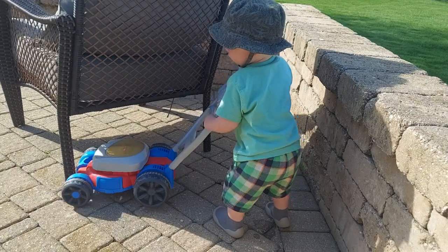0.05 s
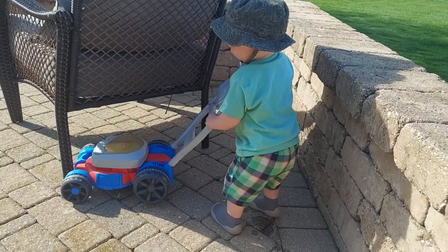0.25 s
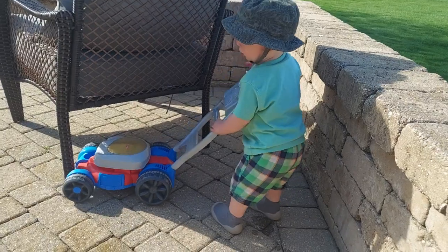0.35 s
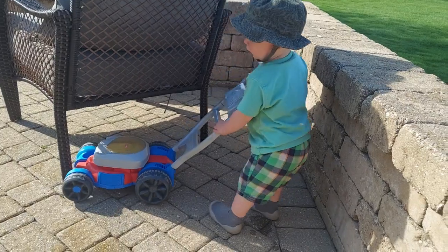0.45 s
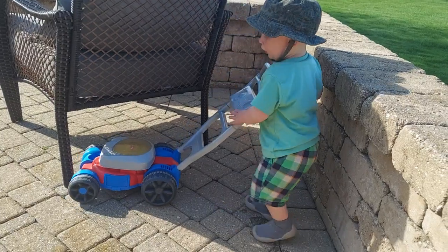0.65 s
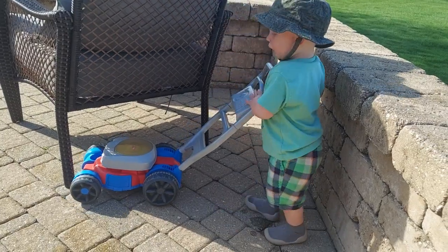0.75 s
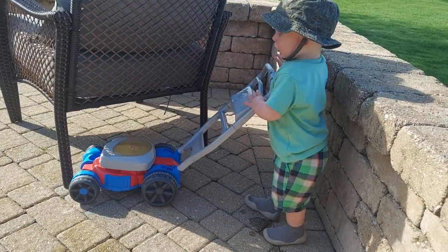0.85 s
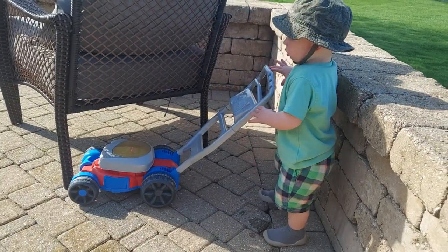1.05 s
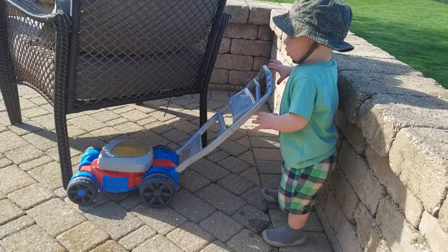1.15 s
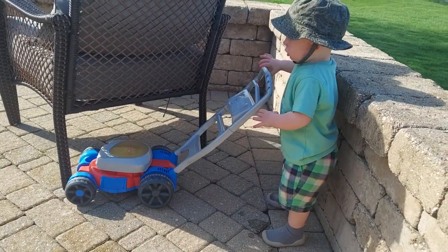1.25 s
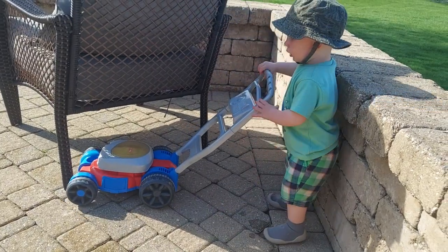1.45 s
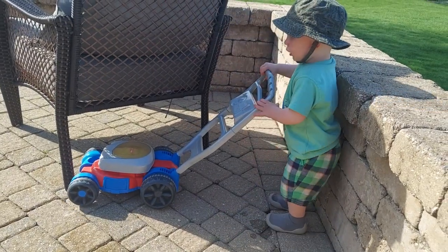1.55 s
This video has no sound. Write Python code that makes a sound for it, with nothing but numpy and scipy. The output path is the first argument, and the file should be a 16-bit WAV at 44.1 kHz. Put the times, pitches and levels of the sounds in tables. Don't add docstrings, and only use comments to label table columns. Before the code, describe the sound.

Plastic toy push mower clatters in two uneven bursts on stone paving, with shoe grit and birdsong

```python
import sys
import numpy as np
from scipy import signal
from scipy.fft import rfft, irfft
from scipy.io import wavfile
from scipy.ndimage import uniform_filter1d

SR = 44100
rng = np.random.default_rng(int(sys.argv[2]) if len(sys.argv) > 2 else 0)


def gain_from_decibels(decibels):
    exponent = np.asarray(decibels, float) / 20
    return 10 ** exponent


def waveform_to_disk(signal):
    frames = np.transpose(np.atleast_2d(signal))
    scaled = np.clip(frames, -1, 1) * 32767
    samples = np.round(scaled).astype(np.int16)
    wavfile.write(sys.argv[1], SR, samples)


N = 70560

OPEN_S = 0.1353

# frequency in Hz, level in dB, t60 in seconds.
SHELL_MODES = [(345.6, 0.5, 0.087), (474, 7, 0.042), (619, -8.5, 0.065), (730.6, 0, 0.03),
               (846, -3.5, 0.043), (944, -5.5, 0.038), (1075.5, -5.5, 0.046), (1344, -15, 0.035),
               (1515, -3.5, 0.079), (1832, -9.5, 0.032), (2050, -2, 0.02), (2240, -4.5, 0.029),
               (2548, 1, 0.018), (3446, 4.5, 0.0062), (4780, -2.5, 0.013)]


def evened(x):
    return x / np.sqrt(np.mean(x ** 2) + 1e-20)


def read(points, hz):
    f, value = np.transpose(points)
    return np.interp(np.log(hz + 1), np.log(f + 1), value)


def coloured(x, points):
    return irfft(rfft(x) * gain_from_decibels(read(points, np.fft.rfftfreq(N, 1 / SR))), N)


def add(mix, s, sound):
    part = mix[round(s * SR):][:len(sound)]
    part += sound[:len(part)]


def stroke(start, hold, t60, rise=.002):
    t = np.arange(N) / SR - start
    return np.clip(t / rise, 0, 1) * gain_from_decibels(-60 * np.maximum(t - hold, 0) / t60)


def clicks(per_s, spread_db):
    draw = rng.random((N, 3))
    happens = draw[:, 0] < per_s / SR
    size = gain_from_decibels(spread_db * np.minimum(-np.log(draw[:, 1] + 1e-9), 5))
    return happens * size * np.sign(draw[:, 2] - .5)


def garden():
    # frequency in Hz, level in dB per Hz.
    hiss = [(120, -29), (200, -1.5), (519, -3.5), (836, -21.5), (1300, -15.5), (1530, -14), (2330, -26),
            (5040, -11), (8200, -20), (8800, -24), (16000, -23)]
    z = rng.standard_normal((3, N))
    air = z[:2] + 0.6 * z[2]
    return gain_from_decibels(-65) * evened(coloured(air, [(60, -15)] + list(hiss)))


def wind():
    # start in seconds, hold in seconds, level in dB, left over right in dB.
    gusts = [(0.146, 0.08, -55, 39), (0.273, 0.054, -38.5, 7.5), (0.4, 0.038, -34.5, 6),
             (0.496, 0.023, -34.5, -8.5), (0.536, 0.025, -39, -9), (0.612, 0.054, -46, 5),
             (0.66, 0.02, -47, -14), (0.714, 0.033, -56.5, -0.5), (0.807, 0.17, -66, 3),
             (0.905, 0.026, -46.5, 10), (0.956, 0.033, -42, -13.5), (1.005, 0.019, -41.5, -9),
             (1.057, 0.02, -51.5, 4), (1.131, 0.1, -44, 40), (1.268, 0.094, -47, 7.5),
             (1.422, 0.063, -48.5, 26)]
    # frequency in Hz, level in dB per Hz.
    buffet = [(8.8, -52), (15, -12), (37, -23.5), (60, -2), (97, -8.5), (184, -24), (237, -30.5),
              (500, -37.5), (650, -85), (1100, -120)]
    calm_db, rise_s, t60_s = -66, 0.0036, 0.13
    wind_db, lumps_db = 1, 1.5
    drift = uniform_filter1d(rng.standard_normal((2, N)), 900, axis=1)
    lumps = evened(uniform_filter1d(drift, 900, axis=1))
    low = evened(coloured(rng.standard_normal((2, N)), list(buffet) + [(1200, -67)]))
    sign = np.array([[1], [-1]])
    force = gain_from_decibels(calm_db)
    for s, hold, db, side_db in gusts:
        share = np.sqrt(2 / (1 + gain_from_decibels(-2 * sign * side_db)))
        force = force + stroke(s, hold, t60_s, rise_s) * gain_from_decibels(db) * share
    return low * force * gain_from_decibels(wind_db + lumps_db * lumps)


def patio(x):
    # frequency in Hz, t60 in seconds.
    decay = [(300, .2), (2000, .16), (10000, .12)]
    taps = np.zeros((2, SR // 2))
    at = np.arange(200, SR // 2 - 20, 20) + rng.integers(0, 20, (2, 1))
    at_uneven = at + rng.integers(-9, 9, at.shape)
    np.put_along_axis(taps, at_uneven, rng.choice([-1., 1.], at.shape), 1)
    hz, t, z = signal.stft(taps, SR, nperseg=256)
    tail = signal.istft(z * gain_from_decibels(-60 * t / read(decay, hz)[:, None]), SR, nperseg=256)[1]
    return signal.fftconvolve(x[None], tail / np.linalg.norm(tail[0]), axes=1)[:, :N]


def ports(x):
    # frequency in Hz, left over right in dB.
    balance = [(250, 0.5), (700, -0.5), (1300, 2.5), (2500, 5), (5000, -10), (15000, -9.5)]
    # frequency in Hz, lead of the left port in radians.
    phase = [(500, 0.16), (1300, 1), (2200, -1.45), (6000, -1.19), (10000, -1.76), (16000, -1.8)]
    hz, half = np.fft.rfftfreq(N, 1 / SR), np.array([[.5], [-.5]])
    return irfft(rfft(x) * gain_from_decibels(half * read(balance, hz)) * np.exp(1j * half * read(phase, hz)), N)


def whistle(points):
    s, hz, db = np.transpose(points)
    t = np.arange(s[0], s[-1], 1 / SR)
    edge = np.clip(np.minimum(t - s[0], s[-1] - t) / 0.0004, 0, 1)
    turn = 2 * np.pi * np.cumsum(np.interp(t, s, hz)) / SR
    return np.sqrt(2) * edge * gain_from_decibels(np.interp(t, s, db)) * np.sin(turn)


def birds():
    # start in seconds, level in dB, rising part over falling part in dB.
    trill = [(.784, -65, -10), (0.847, -63.5, 0), (.911, -60.5, 0), (0.976, -57.5, 3.5), (1.038, -60, 6.5),
             (1.103, -61, -5), (1.164, -56, -10), (1.224, -54, -10), (1.346, -52.5, 6), (1.409, -56, 7),
             (1.472, -51.5, 1.5), (1.534, -54.5, 3), (1.596, -50, 5)]
    # time in seconds, pitch in Hz, level in dB.
    syllable = [
        (0, 6000, -12),
        (.004, 5650, -4),
        (.010, 5000, 0),
        (.016, 4450, -8),
        (.020, 4100, -22),
        (.022, 4600, -10),
        (.025, 6200, -9),
        (.029, 7300, -10),
        (.033, 7900, -16),
    ]
    # time in seconds, pitch in Hz, level in dB.
    warble = [
        (0.696, 3460, -61),
        (.706, 4400, -62),
        (0.715, 4465, -69),
        (0.723, 3870, -52),
        (0.731, 4010, -71),
        (0.74, 3344, -54),
        (0.752, 4370, -57.5),
        (0.762, 2950, -55),
        (0.768, 4200, -73),
    ]
    # delay in seconds, level in dB.
    echoes = [
        (.019, -17),
    ]
    out = np.zeros(N)
    rising = np.array(syllable)[:, :1] > .021
    for (s, db, rise_db), shift in zip(trill, rng.standard_normal(30)):
        pitched = np.array(syllable) * [1, 1 + 0.0133 * shift, 1]
        add(out, s, whistle(pitched + [0, 0, db] + rising * [0, 0, rise_db]))
    add(out, warble[0][0], whistle(warble))
    return out + sum(gain_from_decibels(db) * np.roll(out, round(s * SR)) for s, db in echoes)


def grit():
    # start in seconds, hold in seconds, release t60 in seconds, level in dB, fine over coarse in dB.
    scrapes = [(0.201, 0.0077, 0.035, -53.5, -15), (0.405, 0.0077, 0.28, -56.5, -3.5),
               (0.6238, 0.0015, 0.02, -50, -1), (0.627, 0.083, 0.58, -58.5, -16),
               (0.728, 0.026, 0.4, -70, 6.5), (1.123, 0.0061, 0.049, -30, -5), (1.155, .002, .03, -44, -8),
               (1.13, 0.084, 0.069, -39, -4), (1.223, 0.047, 0.3, -41.5, 0), (1.25, 0.0096, 0.027, -37, 1),
               (1.285, 0.0077, 0.019, -43.5, 7.5), (1.2946, 0.0006, 0.008, -25, 4.5),
               (1.539, 0.0011, 0.026, -62, 2), (1.558, 0.035, 0.088, -60, -4)]
    # frequency in Hz, level in dB per Hz.
    coarse_sand = [(2000, -25), (3500, -13.5), (4300, -34), (5200, -24), (5900, -8.5), (6200, -2.5),
                   (8200, -6), (9000, -24), (11000, -53)]
    fine_sand = [(8000, -36), (9500, -8.5), (10600, -14), (11800, -3.5), (13300, 0), (15900, -8.5),
                 (16500, -29.5)]
    grit_db, patchy_db = -6.5, 3.
    hz, t, z = signal.stft(clicks(per_s=9900, spread_db=2), SR, nperseg=256)
    across_pitch = uniform_filter1d(rng.standard_normal(z.shape), size=4, axis=0)
    patches = evened(uniform_filter1d(across_pitch, size=10, axis=1))
    snaps = signal.istft(z * gain_from_decibels(patchy_db * patches), SR, nperseg=256)[1][:N]
    coarse, fine = evened(coloured(snaps, coarse_sand)), evened(coloured(snaps, fine_sand))
    out = np.zeros(N)
    for s, hold, t60, db, fine_db in scrapes:
        out += stroke(s, hold, t60, hold / 3) * gain_from_decibels(db + grit_db) * (coarse + gain_from_decibels(fine_db) * fine)
    return out


def squeaks():
    # start in seconds, length in seconds, pitch in Hz, level in dB, unsteadiness from 0 to 1.
    axle = [
        (0.2746, 0.13, 2290, -60.5, 0.3),
        (.59, 0.21, 2470, -69.5, 0.31),
        (0.464, 0.046, 625, -50, 0.25),
        (.5, 1.1, 1500, -83.5, 1),
    ]
    overtone_db = -19
    out = np.zeros(N)
    for s, length, hz, db, rough in axle:
        t = np.arange(0, length, 1 / SR)
        wobble = uniform_filter1d(rng.standard_normal((2, N)), 500, axis=1)[:, :len(t)] * np.sqrt(500)
        level_wobble, phase_wobble = wobble
        turn = 2 * np.pi * hz * t + rough * phase_wobble
        shape = np.minimum(np.minimum(t, length - t) / 0.0068, 1) * (1 + rough * level_wobble)
        tone = np.sin(turn) + gain_from_decibels(overtone_db) * np.sin(2 * turn)
        add(out, s, np.sqrt(2) * gain_from_decibels(db) * shape * tone)
    return out


def rattle():
    roll_starts = [.156, .199, .312, .409, .46, .6, 1.112, 1.126, 1.2, 1.54]
    # hold in seconds, release t60 in seconds, level in dB, favoured pitch in Hz.
    rolls = [
        (0.13, 0.34, -51.5, 520),
        (0.015, 0.28, -40.5, 2500),
        (0.023, 0.34, -48.5, 290),
        (0.033, 0.044, -35.5, 1140),
        (0.0092, 0.38, -51, 960),
        (0.18, 0.42, -58.5, 1000),
        (0.0072, 0.063, -33, 240),
        (0.085, 0.4, -35, 1210),
        (0.084, 0.22, -49.5, 1300),
        (0.089, 0.068, -65.5, 640),
    ]
    focus_db = 2.5
    out, t = np.zeros(N), np.arange(6000) / SR
    motion = np.array([stroke(s, hold, t60, 0.0016) * gain_from_decibels(db)
                       for s, (hold, t60, db, _) in zip(roll_starts, rolls)])
    for hz, db, t60 in SHELL_MODES:
        ring = gain_from_decibels(-60 * t / t60) * np.sin(2 * np.pi * hz * t)
        focus = gain_from_decibels(-focus_db * np.log2(hz / np.array(rolls)[:, -1]) ** 2)
        hits = evened(clicks(per_s=2500, spread_db=3.5)) * (focus @ motion)
        out += signal.oaconvolve(hits, gain_from_decibels(db) * ring)[:N] / 20
    return gain_from_decibels(-5) * out


def struck_shell(blows, focus_db, tick_db):
    detune, scatter_db = .01, 2.
    out, t = np.zeros(N), np.arange(6000) / SR
    hz, db, t60 = np.transpose(SHELL_MODES)[:, :, None]
    draws = rng.standard_normal((len(blows), len(SHELL_MODES), 2))
    ticks = rng.standard_normal((len(blows), 400)) * gain_from_decibels(-60 * t[:400] / .008)
    for (s, level_db, near_hz), draw, tick in zip(blows, draws, ticks):
        away_db = focus_db * np.log2(hz / near_hz) ** 2
        gain = gain_from_decibels(db + scatter_db * draw[:, :1] - away_db - 60 * t / t60)
        modes = gain * np.sin(2 * np.pi * hz * (1 + detune * draw[:, 1:]) * t)
        ring = modes.sum(0) * np.minimum(t / 0.0015, 1)
        ring = ring / np.sqrt(np.mean(ring[:300] ** 2))
        add(ring, 0, tick * gain_from_decibels(tick_db))
        add(out, s, gain_from_decibels(level_db - 8.5) * ring)
    return out


def light_taps():
    # time in seconds, strength in dB, pitch in Hz.
    touches = [(.176, -64, 486), (.200, -54, 1500), (.211, -39, 1510), (.314, -57, 470), (.338, -41, 470),
               (.408, -29, 480), (.412, -27, 725), (.426, -23, 735), (.428, -26, 480), (.440, -29.5, 485),
               (.446, -38.5, 483), (.497, -51, 650), (.569, -52.5, 810), (.593, -60, 840), (.626, -63, 810),
               (.636, -51, 474), (.660, -49, 790), (.662, -52, 474), (.700, -55, 810), (.719, -50, 846),
               (.737, -44, 846), (.745, -47.5, 846), (.760, -63, 846), (.774, -43.5, 846), (.800, -62, 890),
               (.830, -59, 870), (1.112, -36.5, 407), (1.124, -28.5, 474), (1.126, -25.5, 944),
               (1.133, -31, 472), (1.140, -32.5, 1500), (1.149, -33, 484), (1.150, -35.5, 2310),
               (1.162, -40, 480), (1.173, -32, 480), (1.173, -33, 944), (1.195, -32, 474),
               (1.199, -34, 2050), (1.204, -44, 474), (1.213, -32, 2070), (1.214, -44, 1510),
               (1.218, -36, 474), (1.229, -38.5, 820), (1.233, -35.5, 2440), (1.238, -34, 2050),
               (1.240, -37, 474), (1.252, -37.5, 2050), (1.256, -34.5, 816), (1.268, -49, 1510),
               (1.281, -38.5, 440), (1.286, -42, 2100), (1.291, -36, 870), (1.292, -37, 1530),
               (1.293, -37, 474), (1.320, -39, 474)]
    return struck_shell(touches, focus_db=200., tick_db=-28)


def knocks():
    # time in seconds, strength in dB, favoured pitch in Hz.
    hits = [(.156, -55, 482), (0.174, -47.5, 410), (.198, -34, 1110), (.205, -35, 1580), (.232, -40, 2670),
            (.240, -43.5, 3220), (0.261, -40.5, 2240), (.312, -41.5, 450), (.337, -39, 657),
            (.408, -27, 900), (.408, -39.5, 2260), (.426, -42, 2560), (.442, -54, 1400), (0.624, -61, 1490),
            (0.738, -50, 1340), (.774, -56.5, 1360), (1.124, -28, 780), (1.129, -33.5, 880),
            (1.296, -53, 1450), (1.552, -53, 395)]
    return struck_shell(hits, focus_db=11., tick_db=-18)


def scene():
    shell = knocks() + light_taps() + rattle() + squeaks()
    airy = grit() + birds()
    direct = ports(shell + airy)
    reflected = patio(gain_from_decibels(-11) * shell + gain_from_decibels(-3) * airy)
    return direct + reflected + wind() + garden() * stroke(OPEN_S, 2, 1, 0.13)


def low_pass(x):
    return signal.sosfilt(signal.butter(12, 16130, fs=SR, output="sos"), x)


def record(dry):
    fade_s = 0.023
    opened = np.clip((np.arange(N) / SR - OPEN_S) / fade_s, 0, 1) ** 2
    return low_pass(dry * (opened + gain_from_decibels(-68)))


dry = scene()
out = record(dry)
waveform_to_disk(out)
```